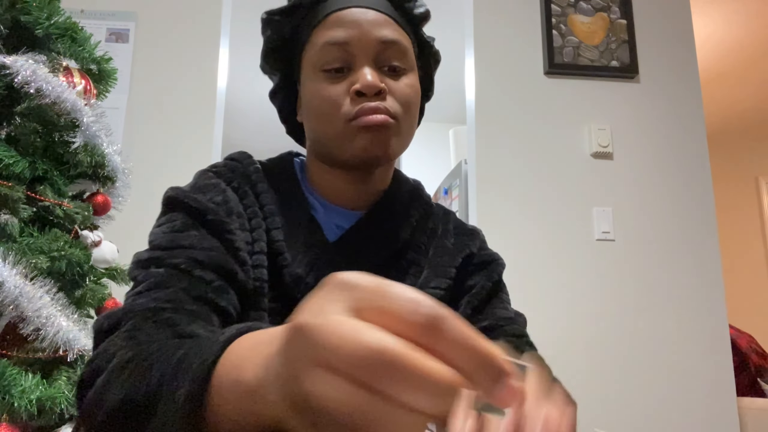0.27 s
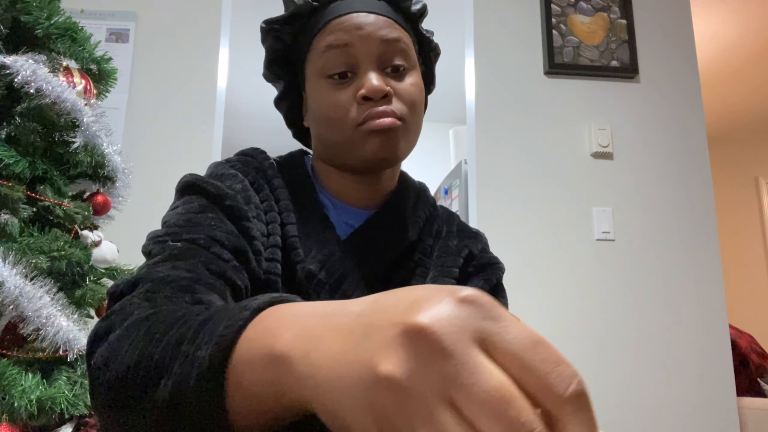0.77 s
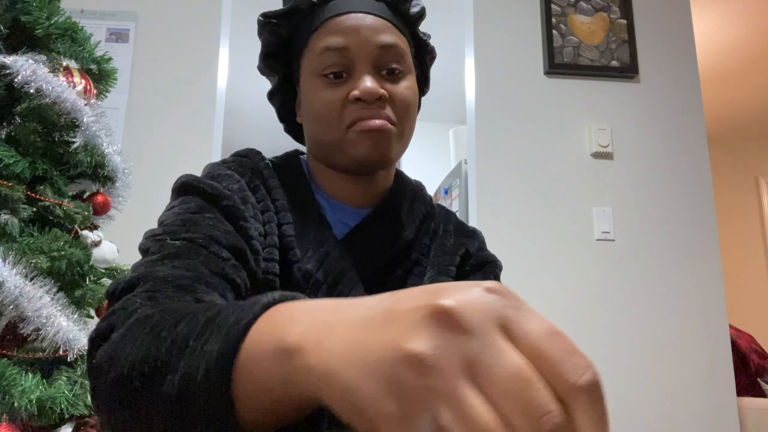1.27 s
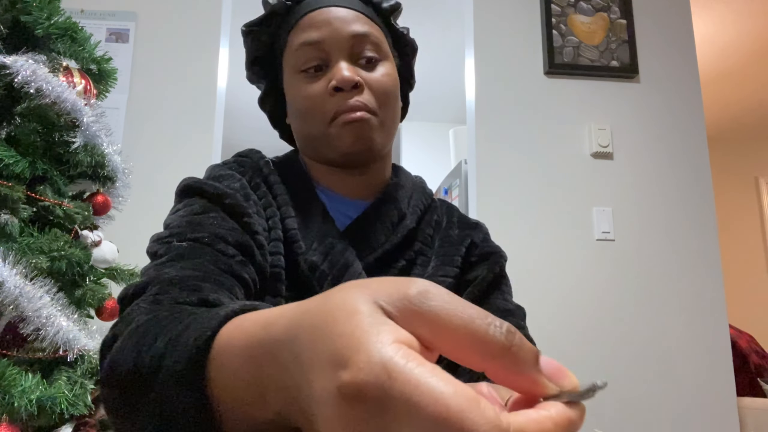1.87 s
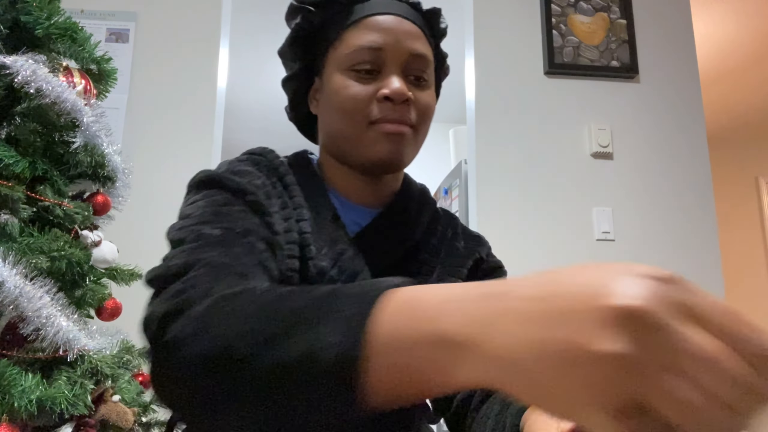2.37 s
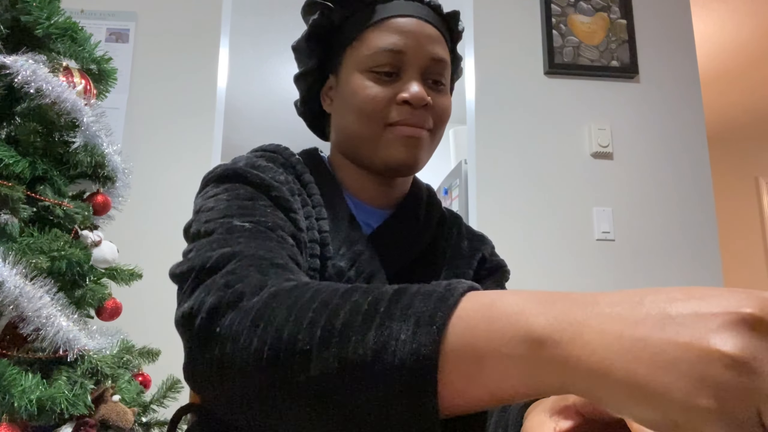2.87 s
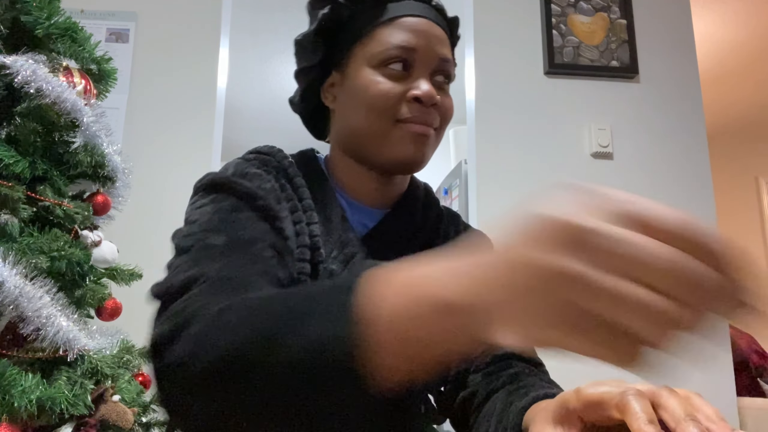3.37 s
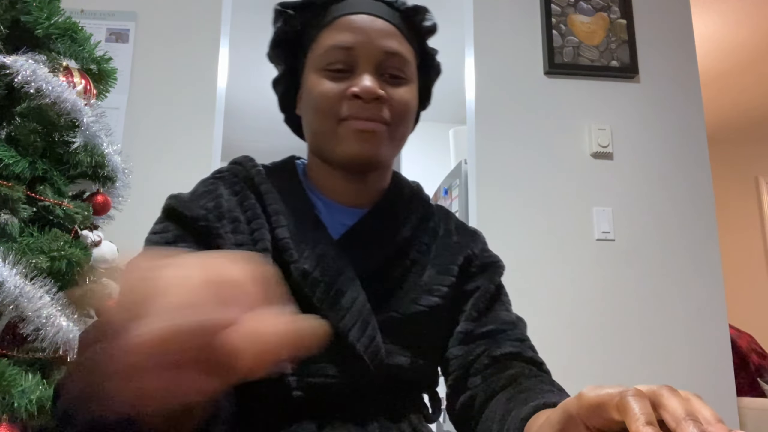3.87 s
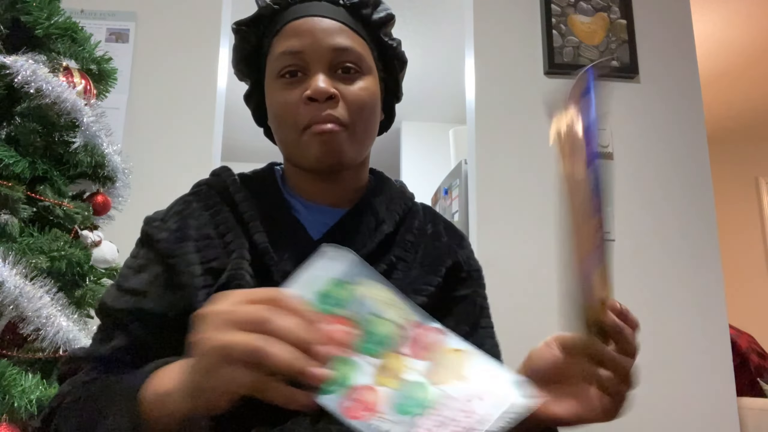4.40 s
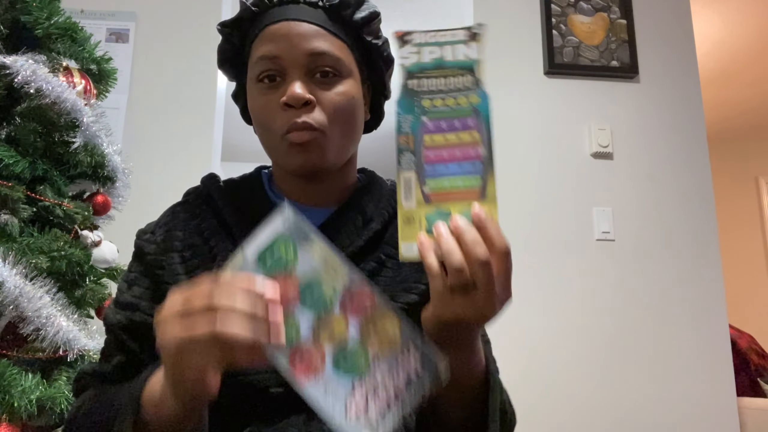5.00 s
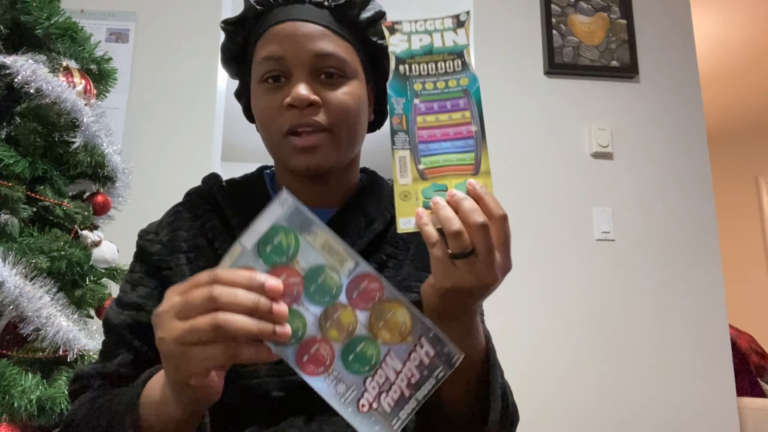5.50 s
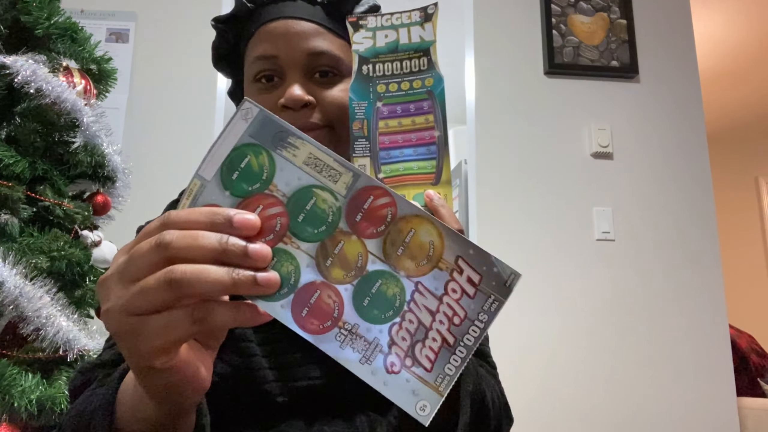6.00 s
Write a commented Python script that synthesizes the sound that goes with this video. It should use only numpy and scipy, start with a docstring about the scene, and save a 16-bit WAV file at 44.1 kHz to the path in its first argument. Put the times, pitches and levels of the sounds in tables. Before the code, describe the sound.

Close on a wooden table in a small quiet humming room, hands bump and cards tick. A coin edge scratches one stiff paper ticket in short uneven strokes, pauses for soft knocks and rustles, then scratches a second. The coin drops, clacks through quick bounces and rattles to rest. Hands thump and shuffle the cards, lift them, and one snaps sharply in the air.

```python
"""Two microphone ports of a laptop, close over a wooden table in a small quiet room that hums throughout.
Hands bump the table and cards tick and rustle; a coin edge slips over one card ticket in short strokes, ringing it.
After more bumps it scratches a second ticket, then drops: each bounce rings coin and wood, and it rattles to rest.
Hands bump and rub the cards again, lift them, and one held in the air snaps.
Bumps ring table modes, ticks are short noise bursts, rustles are shaped grit; echoes and a room tail follow."""
import sys
import numpy as np
from scipy import signal
from scipy.fft import rfft, irfft
from scipy.io import wavfile
from scipy.ndimage import uniform_filter1d

SR = 44100
rng = np.random.default_rng(int(sys.argv[2]) if len(sys.argv) > 2 else 0)


def pcm_store(signal):
    """Save signal as 16-bit PCM."""
    levels = np.round(np.clip(np.atleast_2d(signal), -1, 1) * 32767)
    wavfile.write(sys.argv[1], SR, levels.astype(np.int16).T)


N = 275536
T = np.arange(N) / SR
HZ = np.fft.rfftfreq(N, 1 / SR)

# Coin strokes: start_s, time_to_hardest_push_s, length_s, scrape_db,
# then re the scrape: rasp_db, grit_db, table_db; then loudest_resonance_hz
STROKES = [(0.864, 0.036, 0.069, -34.5, -49, -18, -12.5, 1390),
           (0.979, 0.036, 0.051, -32, -28, -15.5, -31, 1350),
           (1.024, 0.0062, 0.021, -23.5, -21, -15.5, -33, 1100),
           (1.085, 0.016, 0.066, -25.5, -15.5, -20.5, -13, 1350),
           (1.211, 0.046, 0.049, -27.5, -31, -22.5, -30, 1550),
           (1.295, 0.046, 0.085, -26, -22.5, -28, -17, 1640),
           (1.444, 0.022, 0.035, -28, -13.5, -24, -23, 1820),
           (1.535, 0.037, 0.056, -30, -19.5, -29, -12.5, 1910),
           (1.631, 0.013, 0.014, -45.5, -4.5, -15, -1.5, 1430),
           (2.761, 0.032, 0.063, -29, -20.5, -19.5, -5, 1510),
           (2.884, 0.0051, 0.046, -29.5, -14, -17.5, -14, 2090),
           (2.978, 0.045, 0.063, -27, -19.5, -23, -6, 2000),
           (3.09, 0.018, 0.052, -28, -19, -20, -10.5, 2000),
           (3.191, 0.033, 0.051, -26.5, -14, -20.5, -9, 2000),
           (3.284, 0.024, 0.041, -27, -14.5, -17, -8.5, 1900),
           (3.345, 0.007, 0.051, -51, -29, -31, -4, 1830)]
# Resonances of each ticket under the coin: pitch_hz, width_hz, level_db
FIRST_TICKET_MODES = [(618, 68, -3), (903, 82, 0.5), (1125, 100, 0), (1230, 70, 1.5), (1350, 98, -0.5),
                      (1574, 105, -3.5), (1690, 96, -3), (1956, 207, -5), (2310, 290, -12.5),
                      (2656, 170, -4), (2860, 270, -3), (3260, 180, -3.5), (3680, 150, -8),
                      (4410, 390, -20.5)]
SECOND_TICKET_MODES = [(780, 200, 1), (1002, 230, 4), (1210, 98, 3), (1360, 80, 0.5), (1570, 130, -0.5),
                       (1640, 130, -1), (1820, 150, -3), (2024, 100, -2), (2140, 57, -3), (2363, 82, -6),
                       (2600, 136, -1.5), (2920, 113, 1.5), (3232, 110, -5), (3530, 130, -5),
                       (4460, 190, -12)]
# Tone of fine grit: pitch_hz, relative_level_db (per Hz)
HISS_TONE = [(1500, -18), (3000, -7.5), (4500, -11), (6000, -8), (7500, -5), (10000, -5.5), (12000, -2.5),
             (14000, -12.5), (15500, -8)]
# Contacts of the dropped coin: start_s, peak_db (before the coin's final tone), brightness_db_per_octave
COIN_CONTACTS = [(3.763, -1, -4), (3.768, -8.5, -2), (3.7889, -4, 8.5), (3.792, -5, 2.5),
                 (3.796, -11.5, 8.5), (3.841, 0, 5.5), (3.843, -11, -4), (3.846, -2.5, 1),
                 (3.885, -30, -3.5), (3.897, -29.5, 1), (3.916, -29.5, 0.5), (3.936, -34, 0),
                 (3.955, -29.5, -2.5), (3.985, -35, -0.5), (4.023, -31, -3.5), (4.043, -33.5, -2.5)]
# Resonances of coin and wood together: pitch_hz, relative_level_db, t60_s
COIN_MODES = [(326, -5, 0.041), (375, -3.5, 0.017), (526, -3, 0.035), (736, -9.5, 0.017), (830, 1, 0.024),
              (1138, 0, 0.022), (1250, 0, 0.029), (1400, -5.5, 0.021), (1480, 1, 0.027),
              (2010, -2.5, 0.047), (2205, -5.5, .018), (2365, -4, 0.027), (2600, -5.5, .014),
              (2850, -5.5, 0.02), (3220, -8.5, .012), (3507, -6.5, 0.01), (3815, -9, 0.018),
              (4380, -10, 0.019), (4850, -14.5, .02), (5325, -14, 0.013)]
# The coin rocks on its rim as it settles: time_s, level_db (before the coin's final tone)
RATTLE = [(3.85, -58), (3.87, -34.5), (3.95, -38.5), (4.03, -41), (4.08, -54.5)]
# Hands landing on the table: start_s, deep_db, low_db, boomy_db, hollow_db, thud_db,
# lag_ms (100 Hz behind the treble), ring_time_ratio (re a free table top)
BUMPS = [(0.082, -33, -33, -29, -26, -23, 8.1, 0.69), (0.335, -31, -31.5, -18.5, -33, -16, 20.84, 1),
         (1.752, -25.5, -37, -34.5, -32, -31, 18.6, 0.84), (2.038, -44, -45, -42, -37.5, -44, 7.1, 0.6),
         (2.236, -41, -40.5, -36, -38.5, -37, 8.6, 0.65),
         (2.318, -31.5, -24.5, -28.5, -19.5, -32, 12, 0.88),
         (2.695, -36.5, -44.5, -33.5, -44, -31, 8.1, 0.96), (3.656, -32.5, -39, -29, -18, -17.5, 6.2, 0.99),
         (3.68, -36.5, -38, -28.5, -20.5, -26.5, 5.7, 0.48),
         (4.09, -16, -25.5, -23.5, -27, -21, 12.6, 0.35), (4.209, -64, -37.5, -41, -41, -31.5, 7, 0.86),
         (4.305, -58, -35, -40.5, -28.5, -32.5, 5.7, 1), (4.372, -45, -24, -26, -27, -23, 5.8, 0.69),
         (4.473, -44.5, -37.5, -33, -22.5, -30, 6, 0.66), (5.515, -64.5, -49, -34.5, -31, -29.5, 9.2, 0.54)]
# Resonances of the table top: pitch_hz, relative_level_db, t60_s
TABLE_MODES = [(42, 2.5, 0.67), (56.66, -1.5, 0.66), (81, 8.5, 0.14), (136.5, 2, 0.33), (180.3, -2.5, 0.34),
               (256, -17.5, 0.027), (283, -0.5, 0.034), (326, 5, 0.05), (401.5, -4.5, 0.05),
               (537, -5.5, 0.06), (633, -5, 0.054), (800, -6.5, 0.05)]
# Tone of the thud: pitch_hz, relative_level_db
THUD_TONE = [(30, -9), (60, -2), (200, 0.5), (500, -7), (900, -12.5), (1500, -30.5), (3000, -61)]
# Nails, card edges and the coin rim: start_s, peak_db, centre_hz, treble_db, treble_centre_hz,
# length_ms (decay constant, held to 0.3-12 ms)
TICKS = [(0.041, -31, 3020, -37, 8600, 1.3), (0.079, -14, 2010, -25, 4700, 1.1),
         (0.081, -18.5, 1190, -36, 3000, 3), (0.201, -63, 1360, -47, 8380, 8.4),
         (0.325, -24, 2050, -16, 4620, 4.9), (0.338, -25, 900, -15, 6800, 6.5),
         (0.447, -42.5, 1510, -45, 5030, 7.9), (0.594, -28.5, 1320, -22.5, 5300, 3.7),
         (0.602, -82, 1480, -53, 5000, 3.2), (1.027, -27.5, 1210, -31, 3816, 4),
         (1.088, -23, 1300, -34, 4500, 4), (1.443, -36, 1750, -53, 4500, 3),
         (1.635, -41, 1280, -53, 4840, 4.1), (1.652, -45, 1280, -30.5, 7200, 3.2),
         (1.741, -42.5, 1170, -103, 4820, 5.1), (1.757, -49, 1110, -51, 7900, 4.2),
         (1.808, -48, 1190, -65, 4790, 5.2), (2.035, -42, 930, -35.5, 8200, 7.1),
         (2.046, -35, 4200, -27, 8050, 1.9), (2.09, -72, 3670, -39, 6930, 2.1),
         (2.234, -48, 1230, -42, 4900, 3.4), (2.261, -41.5, 1063, -51, 4550, 2.7),
         (2.312, -24.5, 3070, -21, 6270, 1.1), (2.317, -24.5, 1360, -25, 8560, 3.4),
         (2.327, -30.5, 990, -24, 5530, 6.2), (2.662, -40.5, 2020, -28.5, 8000, 1.5),
         (2.695, -17, 1850, -35, 2940, 3.5), (2.698, -15, 920, -55, 2480, 3),
         (3.294, -41, 2000, -31, 8000, 1.5), (3.338, -42.5, 2000, -36.5, 8000, 1.5),
         (3.471, -39, 764, -61, 4760, 8.4), (3.656, -23, 1150, -48.5, 2600, 1.5),
         (4.061, -35, 830, -63.5, 4860, 2.4), (4.081, -33, 1210, -33.5, 5270, 6.9),
         (4.086, -29.5, 830, -27.5, 8790, 5.1), (4.102, -27, 3180, -25, 5840, 1.9),
         (4.201, -22, 2890, -51, 5780, 3), (4.25, -28, 3600, -40, 5000, 3.7),
         (4.28, -20, 1820, -22, 7730, 4.4), (4.304, -22.5, 800, -38, 8270, 7.3),
         (4.367, -12.5, 1293, -22.5, 7600, 7.6), (4.373, -16, 1480, -14, 4670, 13.4),
         (4.399, -16, 859, -19, 4460, 4.6), (4.415, -18.5, 2730, -35, 4955, 5),
         (4.453, -23.5, 2400, -29.5, 5300, 14), (4.465, -20.5, 1350, -50, 4890, 9.7),
         (4.484, -27.5, 648, -43, 3000, 3), (4.6, -40, 3500, -55, 5500, 3),
         (5.061, -39, 1290, -66, 9440, 1.7), (5.51, -21, 1400, -4.5, 8000, 0.6),
         (5.5115, -14.5, 5670, -17.5, 7500, 6), (5.513, -29, 625, -30, 5240, 7.8),
         (5.519, -25, 1400, -13, 6730, 1.2), (5.945, -53, 1189, -67.5, 4660, 12.3),
         (6.203, -41.5, 1400, -54, 6600, 1.4)]
# Rubs and rustles: drags of cards, hands and sleeves, and the rustling tails of ticks, bumps and the
# coin drop: start_s, rise_s, hold_s, fade_s (rise and fade span 30 dB),
# hiss_db, swish_db, body_db, table_db; the rise comes before start_s
RUSTLES = [(0.0, 0.011, 3.9, 0.16, -74, -76, -75.5, -66.5),
           (0.0, .01, 0.0058, 0.12, -32, -55, -44.5, -43.5),
           (0.081, 0.14, 0.055, 0.13, -50.5, -54, -52, -41.5),
           (0.344, 0.077, 0.0072, 0.19, -52, -46, -47.5, -39),
           (0.446, 0.022, 0.0057, 0.094, -48.5, -65, -55, -44.5),
           (0.597, 0.058, 0.012, 0.097, -56, -65, -77, -54.5),
           (0.768, 0.29, 0.037, .08, -60, -72, -75, -70), (1.743, 0.033, 0.0082, 0.11, -53, -55, -65, -67),
           (2.035, 0.047, 0.024, 0.077, -54.5, -68, -67, -52.5),
           (2.206, 0.13, 0.04, 0.12, -66.5, -66, -75, -68),
           (2.322, 0.025, 0.0031, 0.095, -46, -42, -54, -32.5),
           (2.54, 0.02, 0.021, 0.13, -54, -75.5, -83, -80),
           (2.69, 0.013, 0.003, 0.11, -72, -78, -66, -32.5),
           (3.673, 0.087, 0.12, 0.27, -62, -66, -66.5, -46),
           (3.778, 0.044, 0.037, 0.23, -79, -54.5, -41.5, -33.5),
           (4.08, 0.054, 0.056, 0.17, -56, -53.5, -49.5, -41),
           (4.208, 0.093, 0.087, 0.07, -39, -40, -40.5, -34),
           (4.314, 0.083, 0.028, 0.063, -34.5, -38.5, -37, -51),
           (4.36, 0.012, 0.0063, 0.16, -56, -29, -71, -28.5),
           (4.449, .04, 0.0085, 0.097, -47, -58, -53, -40.5),
           (4.53, 0.045, 0.073, 0.23, -69, -55.5, -66, -57.5),
           (4.623, 0.15, 0.063, 0.05, -58, -51.5, -53.5, -52),
           (5.061, 0.0084, 0.011, 0.045, -62.5, -93, -66, -57),
           (5.546, .02, 0.011, 0.13, -64.5, -46.5, -63.5, -53)]
# Left port re the right, for each place on or over the table: pitch_hz, left_lead_rad, left_level_db
FIRST_TICKET_PLACE = [(560, -.5, -3), (820, -3.1, 0), (1250, -1.5, -3), (1470, -2.7, 2), (1730, -1.4, 2),
                      (2100, -2.1, 7), (2400, .2, 5), (2640, 1, -3), (2900, 2.4, 0), (3450, 2.3, -4),
                      (4200, .3, 0)]
SECOND_TICKET_PLACE = [(300, .5, -1), (750, -2.9, -2), (1080, -3.2, 0), (1210, -1.8, -1), (1470, -2.9, 3),
                       (1860, -3.3, 2), (2150, -6.3, 0), (2380, -6, -2), (2560, -9, 0), (2900, -11, 2),
                       (3200, -11.2, 6), (3900, -11.5, 3), (4300, -13.2, 0)]
COIN_PLACE = [(150, 0, -1), (300, .6, -5), (560, .3, 4), (690, 0, 3), (820, 3.6, 0), (1000, 1.8, -5),
              (1340, 1.7, 0), (1470, 2.1, 5), (2120, 6, 4), (2300, 5.2, 0), (3160, 6.9, 1), (4300, 5.5, 0)]
HANDS_ON_TABLE_PLACE = [(60, .6, 1), (150, .8, -2), (300, 0, -2), (800, -2.5, 0), (1800, -2, 1),
                        (3500, -1.6, 1), (6500, -1, 0)]
HANDS_IN_AIR_PLACE = [(300, .3, 3), (550, 1.7, 3), (1800, 1.5, 1), (2500, 2.7, 0), (3100, 4.2, -2),
                      (4000, 5.7, -2)]
# Room tail by octave: centre_hz, t60_s, level_db (re direct sound)
ROOM_OCTAVES = [(281, 0.11, 3), (485, 0.31, -1.5), (833, 0.25, -8.5), (2000, 0.26, -6.5), (4445, 0.21, -10),
                (6000, 0.21, -8), (8216, 0.35, -15), (15000, 0.15, -31)]
# Sway of the table under the arms: time_s, level_db
SWAY = [(0.0, -38), (0.16, -90), (0.375, -32), (0.601, -47.5), (0.85, -54), (1.3, -49), (1.7, -58),
        (1.93, -49.5), (2.4, -53), (2.8, -50.5), (3.25, -45), (3.65, -62.5), (4.14, -51.5), (4.3, -40),
        (4.51, -41), (4.7, -63), (5.1, -64), (5.5, -67.5), (6.04, -61)]
# Tone of the room hum: pitch_hz, relative_level_db (per Hz)
AIR_TONE = [(18, -64), (30, -7), (90, -19), (123, 7), (148, -5), (187, -3.5), (359, -16.5), (420, -6),
            (505, -25.5), (546, -13.5), (606, -20), (900, -23), (1400, -23), (2000, -29.5), (2700, -28),
            (3600, -33), (7650, -34.5), (10700, -36.5), (12300, -36.5), (15500, -60.5)]

AIR_DB = -62.5  # level of the part common to both ports
SECOND_TICKET_S, HELD_UP_S = 2.2, 4.9  # strokes move to the second ticket; cards are held up in the air
# The coin sets down, leans in, eases and lifts
TOUCH_S, LIFT_S, LIGHT_START_DB, LIGHT_END_DB = .017, .031, -8.5, -4.5
OFF_SPOT = .2  # gain added for every ticket mode, even far from the favoured pitch
RISE_CYCLES = .7  # onset time constant of a struck mode, in its own cycles
COIN_SCATTER_DB, BLOW_SCATTER_DB = 3, 1.5  # chance in mode levels from hit to hit
STROKE_WAVER_DB, RUSTLE_WAVER_DB = 2, 3.5
SNAP = 2.5  # impulse of first contact, re the noise after it
TICK_RING_DB, TICK_Q = -14, 15  # ring of the card spot
THUD_LEAD_S = .003  # room for the half of the thud that comes before its peak
SHARED_HZ, IN_STEP_HZ, LEAD_S = 6800, 8000, .0002  # treble common to both channels; left lead
TOP_HZ = 15700


def scratch(strokes, modes, focus_octaves=.3, patchy_db=2.0):
    """Slips of the coin edge ring the ticket; the spot under the coin favours modes near one pitch."""
    rows = np.array(strokes)
    spot_hz = np.interp(T, rows[:, 0] + rows[:, 1], rows[:, -1])
    slips = grit(per_s=3800, spread_db=.5)
    card = 0
    for k, (hz, width, mode_db) in enumerate(modes):
        mode = signal.lfilter(*signal.iirpeak(hz, hz / width, SR), slips)
        near = np.exp(-.5 * (np.log2(hz / spot_hz) / focus_octaves) ** 2)
        patchy_gain = undb(mode_db + patchy_db * walk(30))
        card = card + (-1) ** k * patchy_gain * (OFF_SPOT + near) * unit(mode) * np.sqrt(width)
    card = card / np.sqrt(uniform_filter1d(card ** 2, size=1500))  # even out the level
    rasp = unit(band(band(slips, 1700, 3700), 1400, 3900))
    fine = unit(colour(grit(per_s=2000, spread_db=0), HISS_TONE))
    table = .79 * unit(band(slips, 140, 215.4)) + .81 * unit(band(slips, 290, 640))

    scrape, load = 0, 0
    for s, push_s, length_s, db, rasp_db, grit_db, table_db, _ in strokes:
        corners = s + np.array([-TOUCH_S, 0, push_s, length_s, length_s + LIFT_S])
        push = swell(corners, [-30, LIGHT_START_DB, 0, LIGHT_END_DB, -30])
        scrape = scrape + push * undb(db) * (card + undb(rasp_db) * rasp + undb(grit_db) * fine)
        load = load + push * undb(db + table_db)
    load = uniform_filter1d(load, size=SR // 12)  # the heavy top rumbles on between strokes
    return load * table + scrape * undb(STROKE_WAVER_DB * walk(70))


def coin():
    """Each contact chatters briefly and rings coin and wood; then the coin rocks in many small dull contacts."""
    out, t = np.zeros(N), T[:SR // 4]
    hz, mode_db, t60 = np.transpose(COIN_MODES)[:, :, None]
    octaves = np.log2(hz / 1500)
    chance = rng.standard_normal((len(COIN_CONTACTS), len(COIN_MODES) + len(t)))
    for (s, db, tilt_db), luck in zip(COIN_CONTACTS, chance):
        gain = undb(mode_db + tilt_db * octaves + COIN_SCATTER_DB * luck[:len(hz), None])
        chatter = luck[len(hz):] * np.exp(-t / .0014)
        detuned_hz = hz * (1 + .014 * luck[-len(hz):, None])
        onset = 1 - np.exp(-t * hz / RISE_CYCLES)
        modes = np.sum(gain * ring(detuned_hz, t60, t) * onset, axis=0)
        body = modes + .45 * signal.fftconvolve(chatter, modes)[:len(t)]
        crack = band(chatter, 870, 4000)
        add(out, s, undb(db) * (body / abs(body).max() + .74 * crack / abs(crack).max()))
    dull = np.sum(undb(mode_db - 3.8 * octaves) * ring(hz, t60, t), axis=0)
    rocking = unit(signal.fftconvolve(grit(per_s=160, spread_db=-.5), dull)[:N])
    out = out + rocking * swell(*np.transpose(RATTLE))
    return colour(out, [(120, -24), (300, -1.5), (900, 2.5), (4500, -3.5), (7000, -9), (15000, -12.5)])


def bumps():
    """Each blow thuds and rings the table top; bending waves bring the treble first and the bass last."""
    out, t = np.zeros(N), T[:SR // 2]
    f = np.fft.rfftfreq(SR, 1 / SR)
    thud_hz, thud_tone_db = np.transpose(THUD_TONE)
    thud = undb(np.interp(np.log(f + 1), np.log(thud_hz), thud_tone_db))
    thud = thud / irfft(thud).max()
    thud = thud * np.exp(-2j * np.pi * f * THUD_LEAD_S)
    chance = rng.standard_normal((len(BUMPS), 2, len(TABLE_MODES)))
    for (s, deep_db, low_db, boom_db, hollow_db, thud_db, lag_ms, free), (luck, detune) in zip(BUMPS, chance):
        body = 0
        for (hz, mode_db, t60), c, d in zip(TABLE_MODES, luck, detune):
            db = deep_db if hz < 100 else low_db if hz < 155 else hollow_db if hz > 220 else boom_db
            gain = undb(mode_db + db + BLOW_SCATTER_DB * c)
            onset = 1 - np.exp(-t * hz / RISE_CYCLES)
            body = body + gain * ring(hz * (1 + .02 * d), np.clip(free, .2, 2) * t60, t) * onset
        # arrival is late by lag * sqrt(100 Hz / f), counted from 900 Hz
        travel = np.exp(-2j * np.pi * max(lag_ms, 0) / 1000 * (2 * np.sqrt(100 * f) - f / 3))
        blow = irfft((rfft(body, SR) + undb(thud_db) * thud) * travel)
        add(out, s - THUD_LEAD_S, blow[:len(t)])
    return out


def ticks():
    """A short burst through a broad card resonance, with a sharp bright edge and a papery flutter after it."""
    out, t = np.zeros(N), T[:8000]
    chance = rng.standard_normal((len(TICKS), 2, len(t)))
    for (s, db, hz, treble_db, treble_hz, ms), (noise, flutter) in zip(TICKS, chance):
        burst = noise * np.exp(-t * 1000 / np.clip(ms, .3, 12)) * (1 - np.exp(-t / .000099))
        burst[2] += SNAP
        body = band(band(burst, hz / 1.8, hz * 1.2), hz / 1.2, hz * 1.3)
        edge = band(burst * np.exp(-t / .0048), treble_hz / 1.85, treble_hz * 1.6)
        spot = signal.lfilter(*signal.iirpeak(hz, TICK_Q, SR), burst)
        body = body / abs(body).max() + undb(TICK_RING_DB) * spot / abs(spot).max()
        tail = unit(band(flutter, 360, 3200)) * np.exp(-t / .014) * undb(treble_db - 25.5)
        add(out, s, undb(db) * body / abs(body).max() + undb(treble_db) * edge / abs(edge).max() + tail)
    return out


def rustle():
    """Rubs, rustles and the noisy tails of ticks and knocks: fine hiss, a crackly papery middle, two dull bands."""
    slips = grit(per_s=1000, spread_db=-.5)
    fine = unit(colour(grit(per_s=4300, spread_db=-2.5), HISS_TONE))
    swish = unit(band(slips + grit(per_s=2200, spread_db=-1), 1700, 3800))
    swish = swish * undb(RUSTLE_WAVER_DB * walk(40))
    body = unit(band(slips, 470, 1600)) * undb(RUSTLE_WAVER_DB * walk(48))
    table = unit(band(slips, 100, 840))
    layers = np.array([fine, swish, body, table])
    power = np.zeros_like(layers)  # overlapping rustles add in power
    for s, rise_s, hold_s, fade_s, *db in RUSTLES:
        shape = swell(s + np.array([-rise_s, 0, hold_s, hold_s + fade_s]), [-30, 0, 0, -30])
        power[:, shape > 0] += (undb(db)[:, None] * shape[shape > 0]) ** 2
    return np.sum(np.sqrt(power) * layers, axis=0)


def ports(x, place, echo_db):
    """Two ports hear a near source with a phase that turns with pitch, each with its own table and lid echoes."""
    hz, lead, db = np.transpose(place)
    half = np.exp(.5j * np.interp(HZ, hz, lead)) * undb(np.interp(HZ, hz, db) / 2)
    t = T[:800]
    echoes = rng.standard_normal((2, len(t))) * np.exp(-t / .02)
    echoes = echoes * (rng.random((2, len(t))) < .1)  # sparse reflections
    size = np.sqrt(np.sum(echoes ** 2, axis=1, keepdims=True))
    echoes = undb(echo_db) * band(echoes, 250, 15000) / size
    return irfft(rfft(x) * (np.array([half, 1 / half]) + rfft(echoes, N)), N)


def room(x):
    """Walls answer with a decaying tail in each octave, unrelated left and right."""
    t = T[:SR // 2]
    noise = rng.standard_normal((2, len(t))) * (1 - np.exp(-t / .00093))
    tail = 0
    for hz, t60, db in ROOM_OCTAVES:
        low_hz = hz / np.sqrt(2)
        part = band(noise, low_hz, hz * np.sqrt(2)) * np.exp(-np.log(1000) * t / t60)
        tail = tail + undb(db) * part / np.sqrt(np.sum(part ** 2) / 2 * SR / 2 / low_hz)
    return signal.fftconvolve(x[None], tail, axes=1)[:, :N]


def sway():
    """Low wobble of the table, felt by both ports: narrow low noise, partly unlike left and right."""
    s, db = np.transpose(SWAY)
    both, apart = (unit(band(band(rng.standard_normal(N), 21, 100), 42, 83)) for _ in range(2))
    return undb(np.interp(T, s, db)) * (both + .55 * apart * np.array([[1], [-1]]))


def air():
    """Steady shaped noise of the room; the bass is more alike at both ports."""
    mid, side = (colour(rng.standard_normal(N), AIR_TONE) for _ in range(2))
    side = side - .6 * band(side, 20, 300)
    return undb(AIR_DB) * (mid + np.array([[1], [-1]]) * side) / mid.std()


def undb(db):
    """Decibels to amplitude ratio."""
    return 10 ** (np.asarray(db) / 20)


def unit(x):
    """Scale to an rms of 1."""
    return x / np.sqrt(np.mean(x ** 2))


def band(x, lo_hz, hi_hz):
    """Pass the band between two pitches with gentle slopes."""
    return signal.sosfilt(signal.butter(2, [lo_hz, min(hi_hz, .45 * SR)], "band", fs=SR, output="sos"), x)


def colour(x, points):
    """Shape the spectrum by (Hz, dB) points."""
    hz, db = np.transpose(points)
    return irfft(rfft(x) * undb(np.interp(np.log(HZ + 1), np.log(hz), db)), N)


def grit(per_s, spread_db):
    """Slips at random moments, as impulses of uneven size."""
    hit = rng.random(N) < per_s / SR
    return unit(hit * rng.standard_normal(N) * undb(spread_db * rng.exponential(size=N)))


def ring(hz, t60, t):
    """A decaying sine, 60 dB down after t60 seconds."""
    return np.sin(2 * np.pi * hz * t) * np.exp(-np.log(1000) * t / t60)


def walk(per_s):
    """Slow chance with spread near 1."""
    k = int(SR / per_s)
    steps = np.repeat(rng.standard_normal(N // k + 1), k)
    return 1.3 * uniform_filter1d(uniform_filter1d(steps, k), k)[:N]


def swell(times, db):
    """Gain through (s, dB) corners, silent outside them."""
    times, gain = np.maximum.accumulate(times), np.zeros(N)
    span = slice(max(int(times[0] * SR), 0), max(int(times[-1] * SR), 0))
    gain[span] = undb(np.interp(T[span], times, db))
    return gain


def add(out, s, x):
    """Lay a sound into the track at a time in seconds."""
    i = int(s * SR)
    out[i:i + len(x)] += x[:N - i]


def scene():
    """Place the sources around the two ports, then add the room, the table sway and the hum."""
    first = scratch([row for row in STROKES if row[0] <= SECOND_TICKET_S], FIRST_TICKET_MODES)
    second = scratch([row for row in STROKES if row[0] > SECOND_TICKET_S], SECOND_TICKET_MODES)
    hands = rustle() + ticks() + bumps()
    drop = coin()
    held = T > HELD_UP_S
    near = ports(first, FIRST_TICKET_PLACE, echo_db=-11)
    near = near + ports(second, SECOND_TICKET_PLACE, echo_db=-11)
    near = near + ports(drop, COIN_PLACE, echo_db=-11)
    near = near + ports(hands * ~held, HANDS_ON_TABLE_PLACE, echo_db=-6)
    near = near + ports(hands * held, HANDS_IN_AIR_PLACE, echo_db=-10)
    return near + room(first + second + hands + drop) + sway() + air()


def record(dry):
    """In the top treble both channels carry nearly one sound, the left early; the input clips and cuts the top."""
    spectrum = rfft(dry) / (1 + (36 / (HZ + 1)) ** 4)  # the microphone loses the deepest bass
    turn = np.exp(1j * np.pi * (HZ - IN_STEP_HZ) * LEAD_S)
    shared = .96 / (1 + (SHARED_HZ / (HZ + 1)) ** 12)
    spectrum = (1 - shared) * spectrum + shared * spectrum[0] * np.array([turn, 1 / turn])
    clipped = np.clip(irfft(spectrum, N), -1, 1)
    return signal.sosfilt(signal.ellip(8, .2, 70, TOP_HZ, fs=SR, output="sos"), clipped)


dry = scene()
out = record(dry)
pcm_store(out)
```